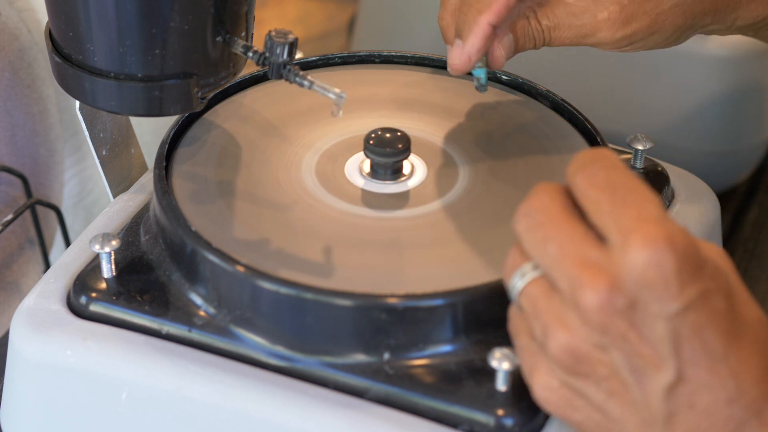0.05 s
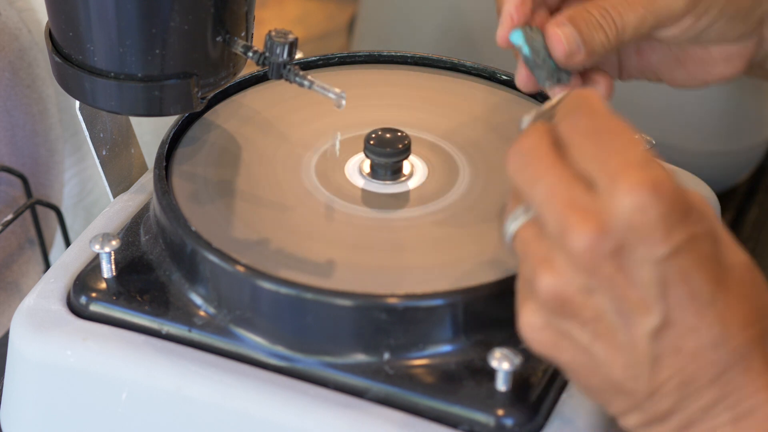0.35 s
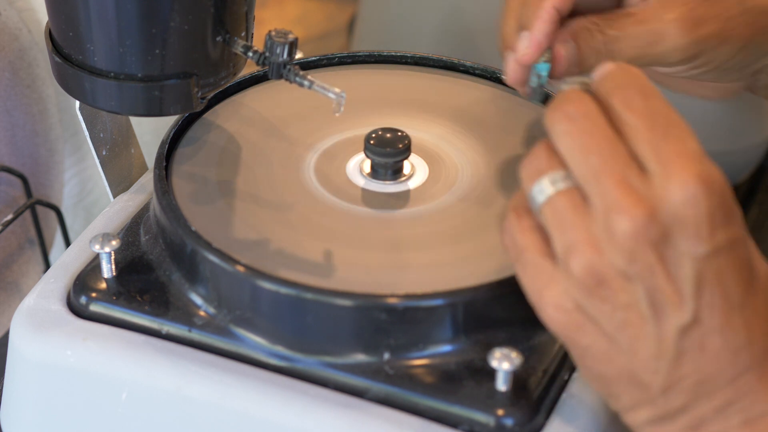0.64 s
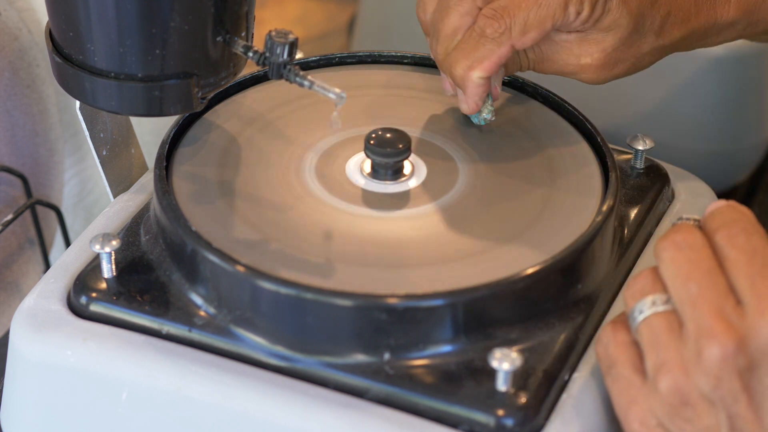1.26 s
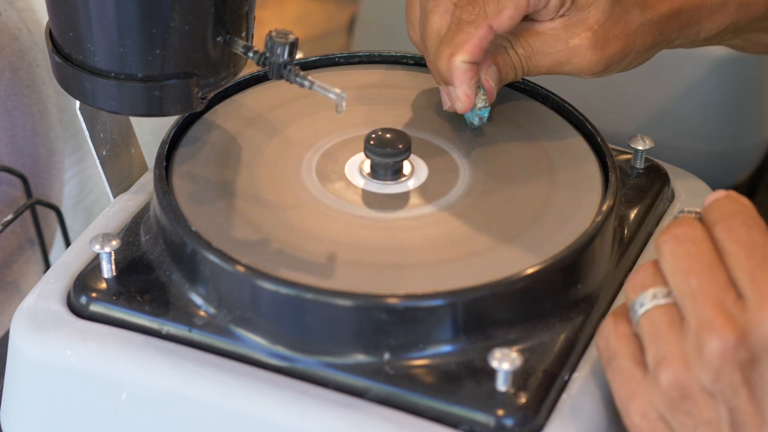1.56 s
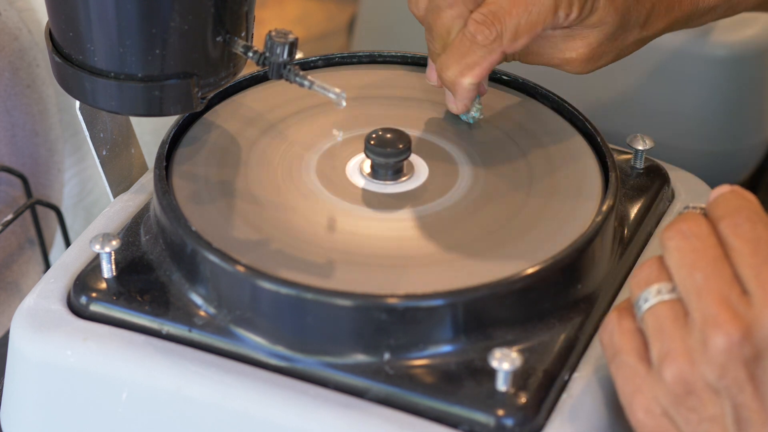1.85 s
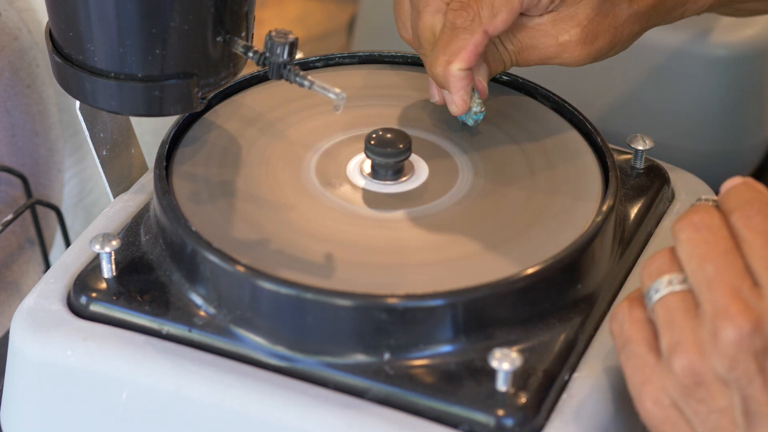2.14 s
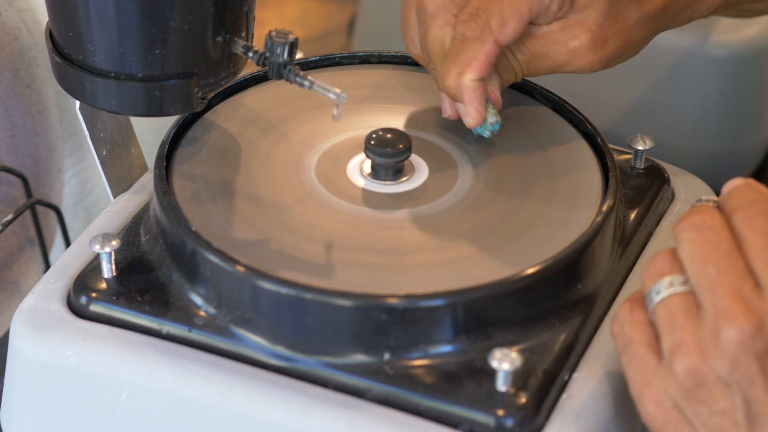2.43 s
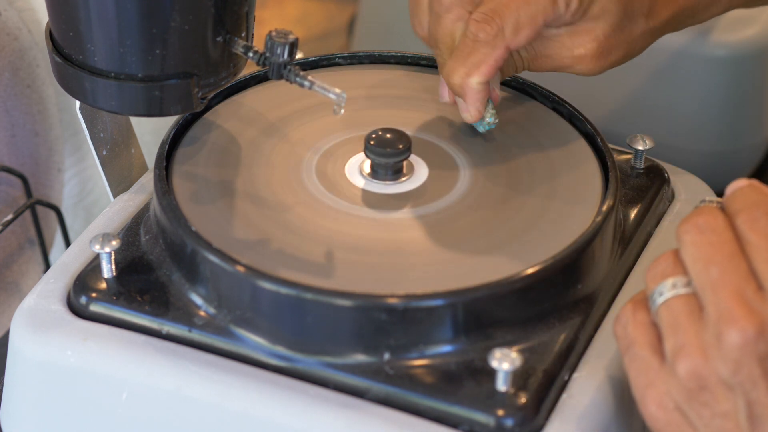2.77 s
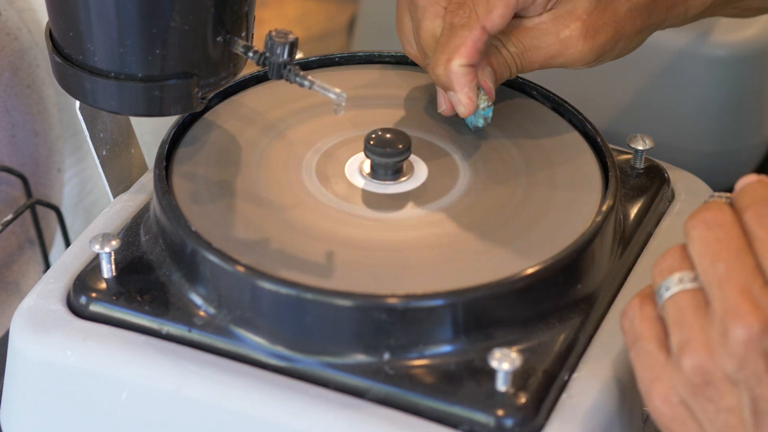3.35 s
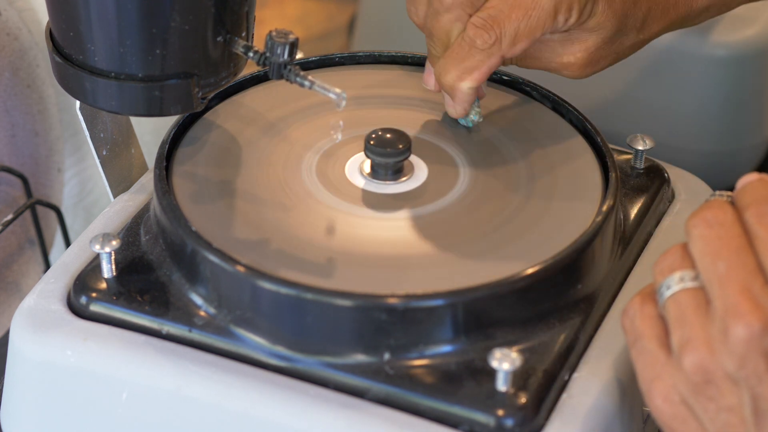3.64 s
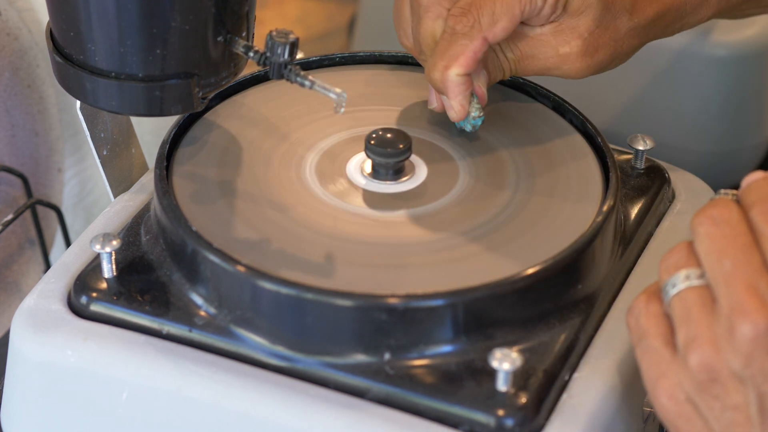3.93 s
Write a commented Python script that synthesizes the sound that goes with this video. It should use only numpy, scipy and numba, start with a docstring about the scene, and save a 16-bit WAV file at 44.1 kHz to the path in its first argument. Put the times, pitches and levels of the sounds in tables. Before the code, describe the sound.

A small stone grinds on a spinning abrasive disc, hissing over a faint motor hum.

```python
"""A workshop lap hums and whines, its abrasive disc spinning free; fingers brush a small stone.
Just after a second the stone meets the disc: grit strikes it thousands of times a second, ringing the
contact, the disc and the housing. The grinding swells with hand pressure, and the sizzle pulses once a
turn as the disc slows under load. The stone squeals where it catches; a faint rumble comes in late."""
import sys
import numpy as np
from scipy import signal
from scipy.fft import rfft, irfft
from scipy.io import wavfile
from scipy.ndimage import uniform_filter1d, map_coordinates
from numba import njit

SR = 44100
rng = np.random.default_rng(int(sys.argv[2]) if len(sys.argv) > 2 else 0)


def transcribe(signal):
    """Save signal, clipped to [-1, 1], as a 16-bit WAV file at the path in sys.argv[1]."""
    frames = np.atleast_2d(signal).T
    limited = np.clip(frames, -1, 1)
    pcm = np.round(limited * 32767).astype(np.int16)
    wavfile.write(sys.argv[1], SR, pcm)


N = 176400

# mains hum: pitch_hz, level_db
MAINS_TONES = [(59.6, -65.5), (120, -78.5)]
# motor tones at idle: pitch_hz, level_db
MOTOR_TONES = [(260, -71), (339, -50.5), (382.2, -62.5), (457.6, -66.5), (516.8, -66.5), (958.2, -63),
               (1884, -69), (1960, -63)]
# fading whine of the drive: time_s, pitch_hz, level_db
DRIVE_WHINE = [(0, 726, -48), (.25, 731, -48.5), (.47, 732, -50.5), (.7, 737, -54.5), (1.1, 741, -55.5),
               (1.5, 741, -64), (4, 722, -59)]
# side tones riding on the whine: pitch_hz, relative_db
WHINE_SIDE_TONES = [(1044, -9), (1762, -12.5), (3241, -15.5)]
# rush of the running machine: frequency_hz, gain_db
RUSH_EQ = [(25, -11), (60, -5), (100, -5), (200, -6), (300, 7.5), (420, 2), (600, 0.5), (830, 10),
           (1050, -0.5), (1300, 2.5), (1600, -0.5), (1950, 8), (2350, -1.5), (2700, -0.5), (3600, -8),
           (3900, -4.5), (4300, -12), (5300, -9.5), (6300, -17.5), (7500, -20.5), (9700, -15.5),
           (12500, -17.5), (15500, -25)]
# fingers on the stone: frequency_hz, gain_db
BRUSH_EQ = [(500, -6), (1200, 2), (3000, 0), (3800, -6), (4350, 0), (4800, -17), (9000, -29)]
# disc rotation since first contact: time_s, turns
DISC_TURNS = [(1.134, 0), (1.484, 7), (1.878, 14), (2.45, 24), (2.863, 31), (3.333, 39), (3.862, 48),
              (4.037, 51)]
# hand pressure, as a fader on the grind: time_s, gain_db
PRESSURE_FADER = [(1.13, -34), (1.15, -27.5), (1.18, -31), (1.22, -24.5), (1.41, -18.5), (1.88, -21),
                  (1.9, -23), (2.11, -18), (2.19, -20.5), (2.34, -20), (2.38, -22.5), (2.48, -17.5),
                  (2.61, -22.5), (2.69, -19.5), (2.79, -21.5), (2.87, -17.5), (3.01, -22.5), (3.1, -16),
                  (3.11, -21.5), (3.22, -19), (3.26, -22), (3.29, -16.5), (3.44, -23), (3.58, -17.5),
                  (3.66, -23), (3.67, -20.5), (3.83, -21.5), (3.86, -15.5), (3.9, -23), (3.94, -18),
                  (3.98, -22), (4.0, -23.5)]
# contact resonance, moving as the stone is rocked: time_s, pitch_hz
CONTACT_PITCH = [(1.15, 2150), (1.37, 2560), (1.4, 2410), (1.65, 2220), (1.75, 1900), (2.05, 2290),
                 (2.13, 2180), (2.21, 2280), (2.26, 2040), (2.51, 2320), (2.59, 1990), (2.77, 2070),
                 (2.89, 2460), (3.01, 2090), (3.09, 2080), (3.28, 2490), (3.36, 2190), (3.44, 2130),
                 (3.62, 1970), (3.74, 2650), (3.93, 2500), (4.0, 2190)]
# body of the grind: frequency_hz, gain_db
GRIND_EQ = [(900, -31), (1400, -2.5), (1900, 1.5), (2300, -2), (2700, -1.5), (3000, -4.5), (3600, -4.5),
            (4200, 0.5), (5200, 2), (5900, -6.5), (6900, -15.5), (7600, -24), (10000, -33)]
# ringing modes of disc and stone: pitch_hz, width_hz, gain_db
RING_MODES = [(1604, 14, 3), (1771, 32, -1), (1968, 50, -2), (2177, 35, -7), (2365, 45, -6), (2565, 40, -3),
              (2650, 60, -6), (2920, 18, 2), (2975, 16, 3), (3160, 18, 4), (3466, 16, 7), (3730, 36, -3),
              (4031, 24, 0), (5670, 24, 3)]
# tone of the dull scrape: frequency_hz, gain_db
SCRAPE_EQ = [(450, -26), (560, -15.5), (700, -9.5), (830, -7), (890, 4), (945, -16), (1035, 3.5),
             (1120, -4), (1250, -9), (1500, -2), (2200, -59)]
# swells of the dull scrape: time_s, gain_db
SCRAPE_FADER = [(1.13, -39), (1.15, -31.5), (1.2, -38.5), (1.36, -48.5), (1.84, -38), (1.88, -46.5),
                (2.29, -42.5), (2.42, -48.5), (2.66, -40.5), (2.9, -51), (2.93, -44), (3.11, -44),
                (3.2, -32.5), (3.26, -48), (3.6, -40), (4.0, -50.5)]
# tone of the housing's drone: frequency_hz, gain_db
HOUSING_EQ = [(40, -20), (100, -20.5), (150, -12.5), (205, -23), (260, -6.5), (330, -5.5), (365, -7),
              (405, 6.5), (460, -7), (550, -28.5), (900, -8)]
# swells of that drone: time_s, gain_db
HOUSING_FADER = [(1.12, -52), (1.5, -47.5), (2.1, -48.5), (2.6, -47.5), (3.2, -47), (3.7, -46),
                 (3.92, -45.5), (4.0, -49)]
# tone of the upper rasp: frequency_hz, gain_db
RASP_EQ = [(4500, -21), (5400, 3), (5900, 2), (6200, 4), (6500, 0), (6950, 3), (7400, -5.5), (8300, -4),
           (9500, -14)]
# swells of the rasp: time_s, gain_db
RASP_FADER = [(1.13, -35), (1.29, -28), (1.36, -31.5), (1.79, -38.5), (2.07, -29.5), (2.2, -43),
              (2.43, -29), (2.61, -38), (2.78, -31.5), (2.91, -34.5), (3.02, -39), (3.13, -30), (3.15, -34),
              (3.3, -29), (3.42, -38.5), (3.64, -31), (3.98, -34), (4.0, -35)]
# tone of the sizzle: frequency_hz, gain_db
SIZZLE_EQ = [(4000, -22), (6500, -1), (7500, -7), (8500, -2.5), (10000, -0.5), (11500, -1), (13000, -4.5),
             (14000, -8), (15500, -14)]
# swells of the sizzle: time_s, gain_db
SIZZLE_FADER = [(1.12, -31.5), (1.2, -29.5), (1.24, -26.5), (1.4, -30.5), (1.7, -31), (1.95, -31),
                (2.2, -32), (2.4, -29.5), (2.6, -32), (2.8, -29.5), (3.0, -30.5), (3.33, -29.5),
                (3.45, -32), (3.7, -31), (4.0, -28.5)]
# bright scrape of the disc's high spot: frequency_hz, gain_db
HIGH_SPOT_EQ = [(8500, -20), (10000, -8), (11500, -3), (12400, 0), (13600, 0), (14600, -4), (15600, -11)]
# how hard the high spot meets the stone: time_s, gain_db
HIGH_SPOT_FADER = [(1.12, -44), (1.35, -31), (1.52, -43), (1.8, -48), (1.92, -30), (2.04, -31), (2.2, -50),
                   (2.37, -30), (2.55, -50), (2.77, -30.5), (2.98, -48), (3.12, -35), (3.27, -34),
                   (3.46, -50), (3.64, -31), (3.85, -42), (4.0, -44)]
# tremolo of the worn face, band by band: centre_hz, swing_db, peak_turns
FACE_BANDS = [(2000, 0, 1), (3120, -0.5, 0), (4150, 2.35, 0.25), (5600, 1.8, 0.46), (6350, 2.3, 0.63),
              (8200, 2, 0), (8950, -0.1, .1), (9700, 2.9, .9), (11800, -1, .0), (13200, -10.5, 0.35),
              (14800, -2, .0)]
# close reflections off hand, guard and spout: delay_s, gain_db
REFLECTIONS = [(.0013, -14), (.0027, -13), (.0043, -13), (.0061, -14)]
# squeals and groans as the stone catches: centre_s, half_length_s, pitch_hz, width_hz, level_db
STONE_SQUEALS = [(2.5, 0.042, 3170, 200, -25.5), (2.882, 0.062, 3150, 160, -30),
                 (2.883, 0.039, 4700, 700, -27.5), (3.306, 0.025, 2610, 300, -27),
                 (3.718, 0.046, 2665, 120, -26), (3.851, 0.012, 2700, 400, -20),
                 (3.915, 0.031, 323, 45, -42.5)]
# faint deep flutter: frequency_hz, gain_db
RUMBLE_EQ = [(12, 3), (18, -14), (25, -13), (40, -27), (120, -48)]

TOUCH_S, BITE_S = 1.108, .016  # the stone meets the disc; time to bite
COARSE_GRIT, FINE_GRIT = dict(per_s=13000, spread_db=2.5), dict(per_s=17000, spread_db=3)


def undb(db):
    """Decibels to gain."""
    return 10 ** (np.asarray(db) / 20)


def unit(x):
    """Scale to rms 1."""
    return x / np.sqrt(np.mean(x ** 2))


def curve(rows, column=1):
    """One column of a table, joined by straight lines in time."""
    rows = np.array(rows, float)
    return np.interp(np.arange(N) / SR, rows[:, 0], rows[:, column])


def eq(x, points):
    """Shape by an EQ outline, rolling off beyond its ends; rms 1."""
    points = np.array(points, float)
    hz = np.maximum(np.arange(N // 2 + 1) * SR / N, 1)
    db = np.interp(np.log(hz), np.log(points[:, 0]), points[:, 1])
    low_cut = np.minimum(hz / points[0, 0], 1) ** 2
    high_cut = np.minimum(points[-1, 0] / hz, 1) ** 2
    return unit(irfft(rfft(x) * undb(db) * low_cut * high_cut, N))


def wander(rate_hz):
    """Smooth random modulation; rms 1."""
    hold = max(int(SR / rate_hz), 2)
    steps = rng.standard_normal(N)[np.arange(N) // hold]
    return unit(uniform_filter1d(uniform_filter1d(steps, hold), hold))


@njit
def highpass(x, hz, damping):
    """Resonant state-variable high-pass with a moving edge."""
    out, band_state, low_state = np.empty(len(x)), 0., 0.
    for i in range(len(x)):
        g = np.tan(np.pi * hz[i] / SR)
        band = (band_state + g * (x[i] - low_state)) / (1 + g * (g + damping))
        low = low_state + g * band
        band_state, low_state = 2 * band - band_state, 2 * low - low_state
        out[i] = x[i] - damping * band - low
    return out


def ring(x, hz, width_hz):
    """One mode, gain 1 at its centre."""
    return signal.lfilter(*signal.iirpeak(hz, hz / width_hz, fs=SR), x)


def grit(per_s, spread_db):
    """Dense grain strikes, most small and a few large."""
    struck = rng.random(N) < per_s / SR
    size = undb(spread_db * np.minimum(rng.exponential(size=N), 6))
    return unit(struck * size * rng.choice([-1, 1], N))


def motor_tone(hz, wobble=.00203, flutter_db=.5):
    """A sine that wavers a little in pitch and level."""
    phase = 2 * np.pi * (np.cumsum(hz * (1 + wobble * wander(12))) / SR + rng.random())
    return np.sqrt(2) * np.sin(phase) * undb(flutter_db * wander(6.6))


def motor(t, load_s=1, sink_db=-5, rough_db=5, idle_turn_hz=21):
    """Mains hum, motor tones that sink and roughen under load, a fading whine and the disc's rush."""
    load = np.clip((t - TOUCH_S) / load_s, 0, 1)
    mains = sum(undb(db) * np.sqrt(2) * np.sin(2 * np.pi * hz * t) for hz, db in MAINS_TONES)
    hum = sum(undb(db + load * (sink_db + rough_db * wander(40))) * motor_tone(hz)
              for hz, db in MOTOR_TONES)
    whine = motor_tone(curve(DRIVE_WHINE))
    whine += sum(undb(db) * motor_tone(hz) for hz, db in WHINE_SIDE_TONES)
    whine *= undb(curve(DRIVE_WHINE, column=2))
    rush_db = -51.5 + .7 * np.sin(2 * np.pi * idle_turn_hz * t)
    rush = eq(rng.standard_normal(N), RUSH_EQ) * undb(rush_db)
    return mains + hum + whine + rush


def swell(t, start_s, attack_s, decay_s):
    """An envelope with a straight attack and an exponential tail."""
    age = np.maximum(t - start_s, 0)
    return np.minimum(age / attack_s, 1) * np.exp(-age / decay_s)


def fingers(t):
    """A soft brush as the stone is turned in the hand."""
    envelope = undb(-50) * swell(t, start_s=.535, attack_s=.008, decay_s=.094)
    return envelope * eq(grit(per_s=4000, spread_db=4.5), BRUSH_EQ)


def workshop(x, t, t60_s=.2, predelay_s=.003, wet_db=-13):
    """A short wash of reflections from bench and walls."""
    tail = rng.standard_normal(N) * undb(-60 * t / t60_s) * (t > predelay_s)
    wet = signal.fftconvolve(x, tail / np.sqrt(np.sum(tail ** 2)))[:N]
    return (x + undb(wet_db) * wet) / np.hypot(1, undb(wet_db))


def grinding(t, chatter_hz=262, chatter_db=.86):
    """The stone bites and chatters; the same grit drives the contact, a dull scrape and the housing."""
    turns = curve(DISC_TURNS)
    bite = np.clip((t - TOUCH_S) / BITE_S, 0, 1)
    chatter = undb(chatter_db * wander(chatter_hz))
    strikes = grit(**COARSE_GRIT)
    scrape = eq(strikes, SCRAPE_EQ) * undb(curve(SCRAPE_FADER) - 3)
    housing = eq(strikes, HOUSING_EQ) * undb(curve(HOUSING_FADER))
    cutting = worn_face(contact(strikes, turns) + sizzle(turns), turns)
    return bite * chatter * (close_reflections(cutting) + squeals(t) + scrape + housing)


def once_a_turn(turns, peak):
    """A cosine locked to the disc, cresting `peak` of the way round."""
    return np.cos(2 * np.pi * (turns - peak))


def contact(strikes, turns, mid_edge_hz=1892, follow=.74):
    """Grit rings disc and stone, louder with pressure; the low edge follows the contact resonance."""
    contact_hz = curve(CONTACT_PITCH)
    edge_hz = mid_edge_hz * (contact_hz / np.median(contact_hz)) ** follow
    body = eq(strikes, GRIND_EQ)
    for _ in range(3):
        body = highpass(body, edge_hz, damping=.71)
    ringing = undb(.5) * sum(undb(db) * ring(body, hz, width) for hz, width, db in RING_MODES)
    level_db = curve(PRESSURE_FADER) - .25 - .08 * once_a_turn(turns, peak=.027)
    return unit(body + ringing) * undb(level_db)


def sizzle(turns):
    """Grit rasps and sizzles in step with the disc; its high spot adds one bright scrape a turn."""
    rasp_db = curve(RASP_FADER) - .5 + 2 * once_a_turn(turns, peak=.27)
    rasp = eq(grit(**COARSE_GRIT), RASP_EQ) * undb(rasp_db)
    swing_db = 1.5 * (1 + .23 * wander(3))
    hiss_db = curve(SIZZLE_FADER) - 4 + swing_db * once_a_turn(turns, peak=.031)
    hiss = eq(grit(**FINE_GRIT), SIZZLE_EQ) * undb(hiss_db)
    return rasp + hiss + high_spot(turns)


def high_spot(turns, peak_turns=.02, width_turns=.11):
    """A burst of fine grit each time the disc's high spot passes under the stone."""
    from_spot = (turns - peak_turns + .5) % 1 - .5
    passing = np.exp(-.5 * (from_spot / width_turns) ** 2)
    return eq(grit(**FINE_GRIT), HIGH_SPOT_EQ) * passing * undb(curve(HIGH_SPOT_FADER))


def worn_face(x, turns, drift_hz=7, full_drift_above_hz=7000):
    """Each band pulses with the disc, in a pattern that drifts as the stone moves to new tracks."""
    hz = np.arange(N // 2 + 1) * SR / N
    spectrum = rfft(x)
    centres = np.sort([row[0] for row in FACE_BANDS])
    out = 0
    for share, (centre_hz, swing_db, peak) in zip(np.eye(len(FACE_BANDS)), FACE_BANDS):
        band = irfft(spectrum * np.interp(hz, centres, share), N)
        angle = 2 * np.pi * (turns - peak)
        drift = sum(wander(drift_hz) * np.cos(k * angle) + wander(drift_hz) * np.sin(k * angle)
                    for k in (1, 2))
        drift_db = .9 * min(centre_hz / full_drift_above_hz, 1) * drift
        out = out + band * undb(swing_db * np.cos(angle) + drift_db)
    return out


def close_reflections(x, above_hz=3900, sway_s=.00009, sway_hz=3.5):
    """Nearby surfaces reflect the treble; the colouring glides as the hand sways."""
    treble = signal.sosfilt(signal.butter(4, above_hz, "high", fs=SR, output="sos"), x)
    out = x
    for delay_s, db in REFLECTIONS:
        read_at = np.arange(N) - SR * (delay_s + sway_s * wander(sway_hz))
        out = out + undb(db) * map_coordinates(treble, [read_at], order=3)
    return out


def squeals(t):
    """The stone catches for a moment and one resonance sings out."""
    out = 0
    for centre_s, half_length_s, hz, width_hz, db in STONE_SQUEALS:
        sung = unit(ring(ring(rng.standard_normal(N), hz, width_hz), hz, width_hz))
        envelope = np.exp(-.5 * ((t - centre_s) / half_length_s) ** 2)
        out = out + undb(db) * sung * envelope
    return out


def rumble(t):
    """A faint deep flutter sets in late and dies away."""
    envelope = undb(-43) * swell(t, start_s=3.25, attack_s=.038, decay_s=.66)
    return envelope * eq(rng.standard_normal(N), RUMBLE_EQ)


def scene():
    """A dry bed of motor and rumble, with stone and fingers in the room; mono."""
    t = np.arange(N) / SR
    bed = motor(t) + rumble(t)
    handwork = workshop(grinding(t) + fingers(t), t)
    return (bed + handwork)[None]


def record(dry):
    """A steep high cut at 15.7 kHz takes off the very top."""
    return signal.sosfilt(signal.ellip(10, .2, 80, 15700, fs=SR, output="sos"), dry)


dry = scene()
out = record(dry)
transcribe(out)
```